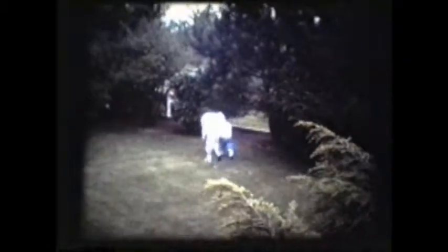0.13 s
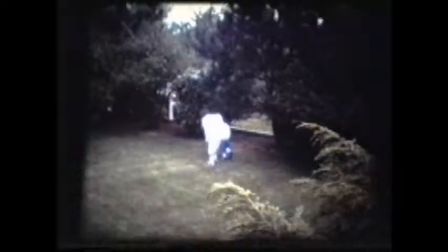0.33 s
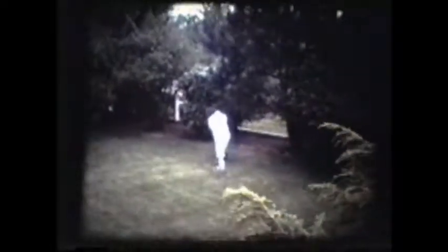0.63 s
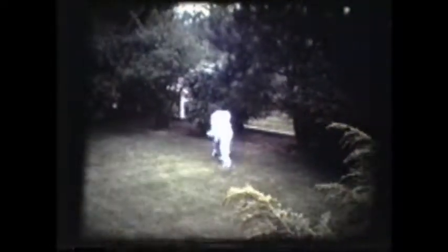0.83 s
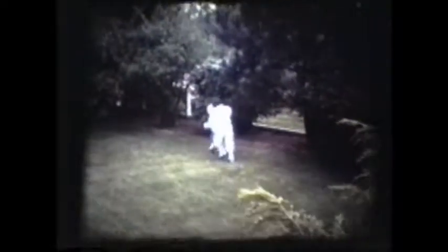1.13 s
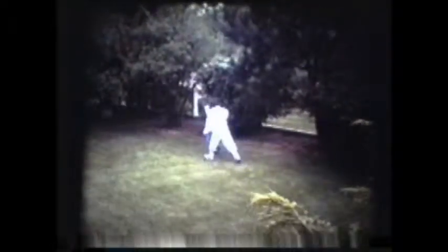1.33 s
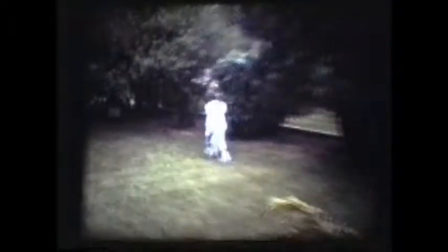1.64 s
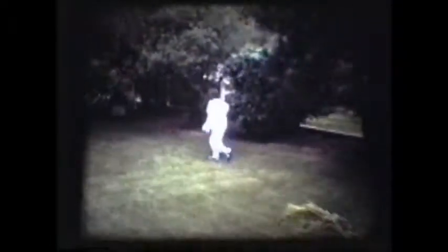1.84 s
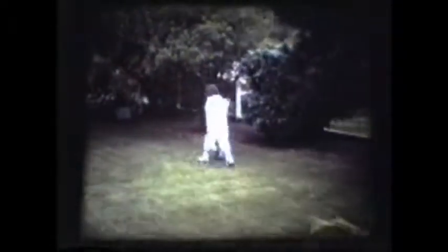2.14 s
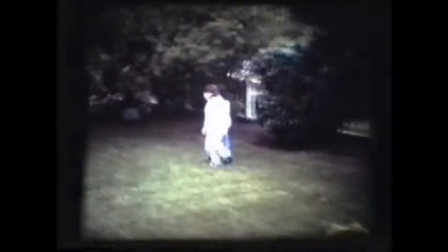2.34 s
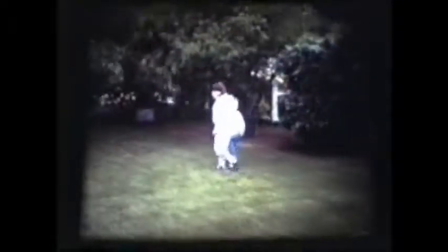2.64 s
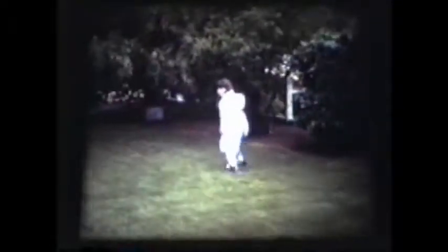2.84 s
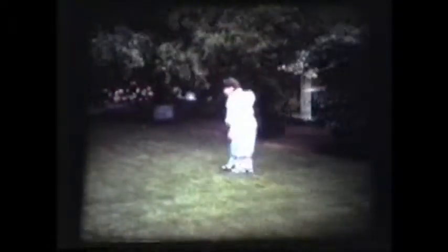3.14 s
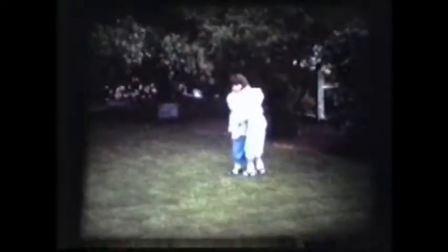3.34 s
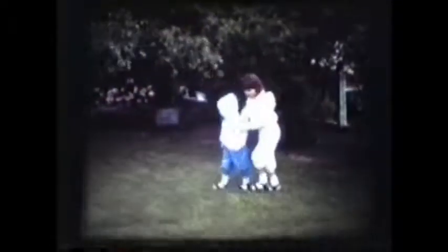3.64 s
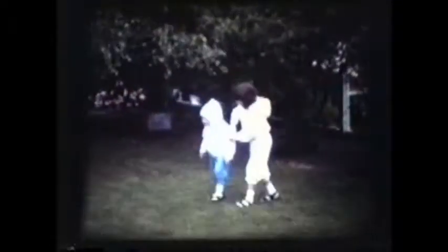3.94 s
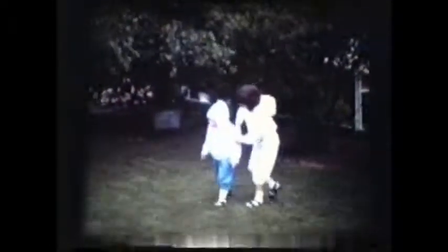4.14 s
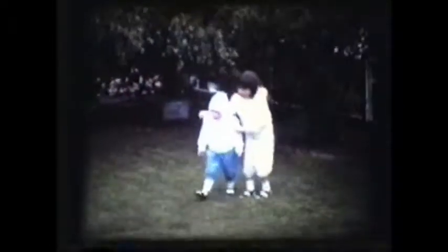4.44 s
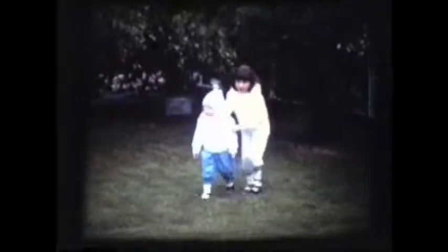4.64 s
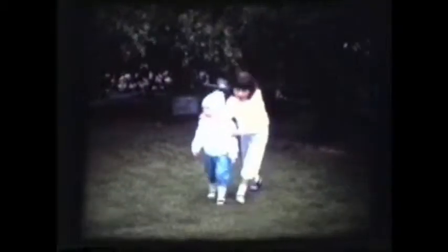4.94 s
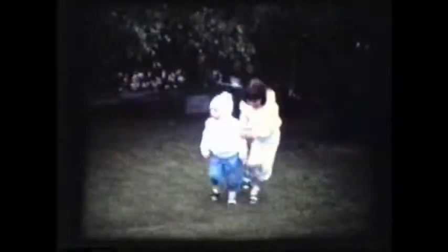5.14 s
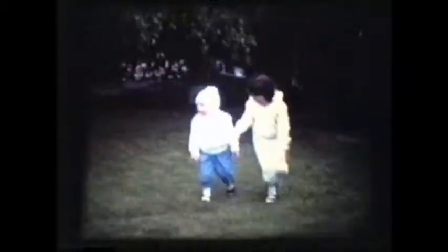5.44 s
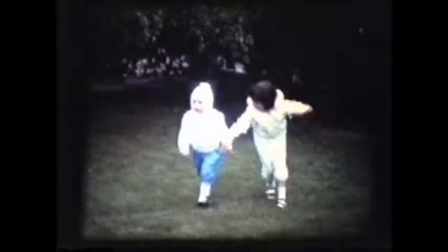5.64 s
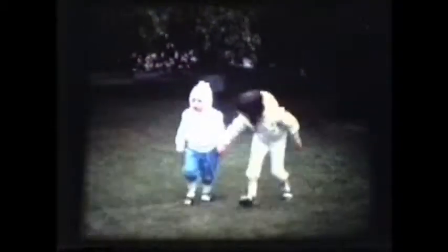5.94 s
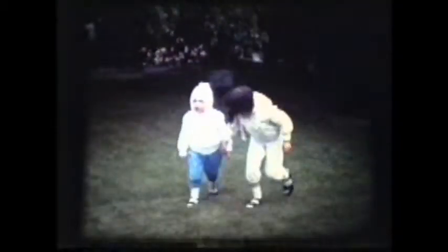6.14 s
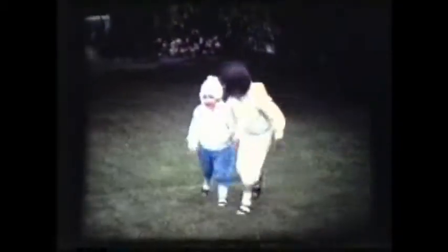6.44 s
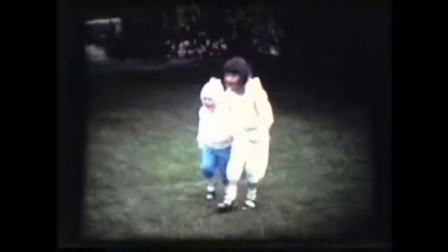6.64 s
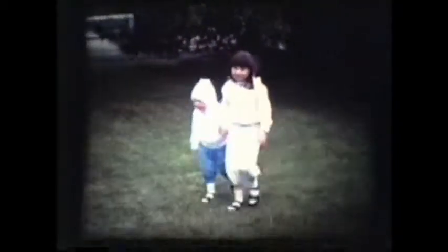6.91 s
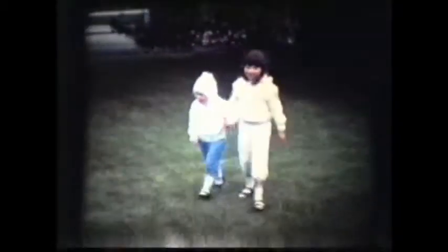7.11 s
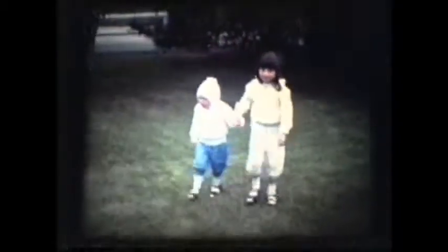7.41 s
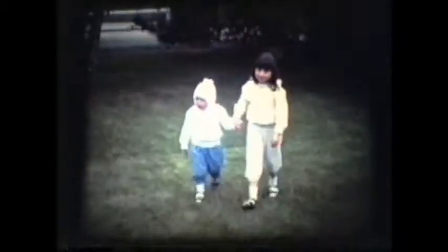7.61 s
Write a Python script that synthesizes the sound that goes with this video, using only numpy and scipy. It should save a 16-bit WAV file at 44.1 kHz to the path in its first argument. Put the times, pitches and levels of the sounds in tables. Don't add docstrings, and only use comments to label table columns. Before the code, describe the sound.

Fast, even metallic clatter from an old home movie projector on a table, heard close with short room reflections. Ringing ticks, loose slaps and gear noise blend with motor hum, a thin whine and airy fan rush. The machine keeps a constant speed throughout, but the sound drops out five times, each with a small bassy thump, near silence, and a quick return.

```python
import sys
import numpy as np
from scipy import signal
from scipy.fft import rfft, irfft, next_fast_len
from scipy.io import wavfile

SR = 44100
rng = np.random.default_rng(int(sys.argv[2]) if len(sys.argv) > 2 else 0)


def wav_out(sig):
    wavfile.write(sys.argv[1], SR, np.round(np.clip(np.atleast_2d(sig).T, -1, 1) * 32767).astype(np.int16))


def gain_from_db(level_db):
    decades = np.asarray(level_db, float) / 20
    return 10 ** decades


N = 342657
FRAME_HZ = 17.585


def rms_one(x):
    return x / np.sqrt(np.mean(x ** 2) + 1e-20)


def shaped(x, spectrum):
    hz, db = np.transpose(spectrum)
    size = next_fast_len(N)
    bin_hz = np.fft.rfftfreq(size, 1 / SR) + 1
    gain = gain_from_db(np.interp(np.log(bin_hz), np.log(hz), db))
    return rms_one(irfft(rfft(x, size) * gain, size)[:N])


def drift(rate_hz):
    r = np.exp(-80 * np.pi * rate_hz / SR)
    noise = rng.standard_normal(N // 40 + 2002)
    slow = signal.lfilter([1], [1, -2 * r, r * r], noise)[2000:]
    return np.interp(np.arange(N) / 40, np.arange(len(slow)), rms_one(slow))


def ring(clicks, hz, width_hz):
    r = np.exp(-np.pi * width_hz / SR)
    w = 2 * np.pi * hz / SR
    return signal.lfilter([0, np.sin(w)], [1, -2 * r * np.cos(w), r * r], clicks + 1e-18)


def body(clicks, modes):
    return sum(gain_from_db(db) * (-1) ** k * ring(clicks, hz, width) for k, (hz, width, db) in enumerate(modes))


def strikes(contacts, jitter_s, spread_db):
    ms, level_db = np.transpose(contacts)
    start = np.arange(-1, int(N / SR * FRAME_HZ) + 1)[:, None] / FRAME_HZ
    at = start + ms / 1000 + jitter_s * rng.standard_normal((len(start), len(ms)))
    height = gain_from_db(level_db + spread_db * rng.standard_normal(at.shape))
    clicks = np.zeros(N + 2 * SR)
    np.add.at(clicks, (at * SR).astype(int), height)
    return clicks[:N]


def tones(lines, waver_db, wander):
    t = np.arange(N) / SR
    total = np.zeros(N)
    for hz, db in lines:
        level = np.sqrt(2) * gain_from_db(db + waver_db * drift(6.8))
        phase = 2 * np.pi * (hz * t + rng.random()) + wander * drift(1.5)
        total = total + level * np.sin(phase)
    return total


def rattle(clicks, swell, grain_db):
    rise, fall = np.exp(-1 / (0.0012 * SR)), np.exp(-1 / (0.0029 * SR))
    after = signal.lfilter([1], np.convolve([1, -rise], [1, -fall]), np.sqrt(clicks))
    grains = rng.standard_normal(N) * gain_from_db(grain_db * drift(130))
    return grains * (1 + swell * after / np.mean(after))


# f/Hz, level/dB rms
HUM = [(50.0, -76.5), (99.97, -70), (149.96, -44), (249.93, -55), (299.9, -73), (349.9, -57.5),
       (449.9, -62.5), (549.8, -62.5)]
# f/Hz, level/dB rms
ROTOR = [(225.4, -66), (285.3, -66), (660.1, -64), (664.8, -62), (812.9, -63), (855.3, -57.5)]


def motor():
    return tones(HUM, waver_db=0.1, wander=0.045) + tones(ROTOR, waver_db=-1.5, wander=0.66)


# f/Hz, level/dB per Hz
FAN = [(15, -37.5), (25, -15.5), (110, -21), (200, -11.5), (300, -15), (400, -7), (520, -9), (750, -4),
       (1000, -5), (1500, -7.5), (2000, -5), (2400, -11), (3200, -18.5), (6000, -47.5)]


def fan(clicks):
    return gain_from_db(-42 + 0.5 * drift(6.4)) * shaped(rattle(clicks, swell=0.17, grain_db=0.7), FAN)


# f/Hz, level/dB per Hz
GEARS = [(1760, -27), (3000, -1.5), (3500, -6.5), (3800, -2.5), (4550, -2), (5050, -6.5), (6270, -8),
         (7010, -15), (9060, -23.5), (10200, -20.5), (12200, -33), (14000, -21), (15800, -28.5)]


def gears(clicks):
    return gain_from_db(-52.5 + 0.24 * drift(4.1)) * shaped(rattle(clicks, swell=0.2, grain_db=2.0), GEARS)


# f/Hz, level/dB per Hz
LINE_HISS = [(18, -30.5), (30, -1), (76, -8), (279, -6.5), (1110, -8.5), (2500, -8.5), (5000, -12.5),
             (8500, -17.5), (10500, -27.5), (16000, -54)]
# f/Hz, level/dB rms
LINE_HUM = [(49.99, -96), (149.96, -101), (499.9, -105), (599.8, -105), (699.8, -103), (799.8, -104),
            (999.7, -104), (1099.7, -104), (1599.6, -104)]


def line_noise(sink_db):
    hiss = gain_from_db(-82 + sink_db) * shaped(rng.standard_normal(N), LINE_HISS)
    return hiss + tones(LINE_HUM, waver_db=-1.5, wander=0.1)


# f/Hz, level/dB per Hz
SIDE_HISS = [(1200, -50.5), (2600, 6.5), (5500, -4), (9000, -21.5), (13000, -22), (16000, -37.5)]


def side_hiss(gain):
    side = gain_from_db(-74.5) * gain * shaped(rng.standard_normal(N), SIDE_HISS)
    return side * [[1], [-1]]


# t/ms, level/dB
KNOCK = [
    (0.3, -43.5),
]
# f/Hz, width/Hz, level/dB
BASE = [(334.1, 7, -8.5), (369.3, 9, -13), (386.9, 7, -4), (457.2, 9, -12), (615.5, 9, -12.5)]
# f/Hz, width/Hz, level/dB
HOUSING = [(1371.6, 14, -6), (1406.8, 14, -7), (1442, 14, -7), (1705.7, 14, -9)]
# t/ms, level/dB
PUSHES = [
    (48.5, -39.5),
]
# f/Hz, width/Hz, level/dB
CASING = [(519, 56, -12.5), (609.4, 44, -13.5), (745.7, 63.7, 1), (906, 45, -15.5), (1020, 50, -13.5)]


def casing():
    knock = strikes(KNOCK, jitter_s=0.00002, spread_db=-1.0)
    base = sum(gain_from_db(db) * ring(knock, hz, width) for hz, width, db in BASE)
    pushes = strikes(PUSHES, jitter_s=0.00004, spread_db=1.6)
    swell = np.zeros(N)
    for k, (hz, width, db) in enumerate(CASING):
        slow = pushes
        for _ in range(3):
            slow = ring(slow, hz, width)
        peak_to_one = 2 * (np.e * np.pi * width / SR) ** 2
        swell = swell + gain_from_db(db) * (-1) ** k * peak_to_one * slow
    return swell + base + body(knock, HOUSING)


# t/ms, level/dB
CONTACTS = [(0.5, -45.5), (7.5, -58.5), (13.5, -47.5), (16.5, -49.5), (24.0, -64.5), (31.0, -55),
            (37.0, -48.5), (45.5, -44.5), (49.0, -46), (53.0, -47.5)]
# f/Hz, width/Hz, level/dB
GATE = [(1871, 160, 8), (1930, 180, -2.5), (2249, 60, -2.5), (2856, 130, 0), (6060, 150, -20.5)]
# t/ms, level/dB
LOOSE_BLOWS = [
    (15.5, -40.5),
    (46.0, -33.5),
]
# t/s, level/dB
CLACKS = [(0.1022, -30), (0.1598, -31), (0.6722, -26), (1.2964, -25.5), (2.0941, -30), (2.2078, -25.5),
          (2.377, -29), (2.8323, -30), (3.0022, -31), (3.1738, -30), (3.201, -29), (3.286, -30),
          (3.6842, -29), (4.197, -30), (5.166, -30), (5.3009, -30), (5.676, -25.5), (6.2439, -28.5),
          (6.8116, -25.5), (7.097, -30), (7.1545, -30), (7.551, -31), (7.7244, -30)]
# f/Hz, width/Hz, level/dB
BLOW = [(1760, 330, 3), (2500, 600, -8), (4400, 900, -14)]
# t/ms, level/dB
TICKS = [(2.8, -55), (33.5, -47), (37.5, -50), (43.2, -43), (46.0, -46), (49.0, -47.5)]
# f/Hz, width/Hz, level/dB
TIP = [(3710, 350, 4), (4220, 93, -4.5), (4655, 120, -4), (5550, 120, -10)]


def gate():
    clicks = strikes(CONTACTS, jitter_s=0.0005, spread_db=3.5)
    slaps = strikes(LOOSE_BLOWS, jitter_s=0.0012, spread_db=3.0)
    s, clack_db = np.transpose(CLACKS)
    slaps[(s * SR).astype(int)] = gain_from_db(clack_db + 1.3)
    ticks = strikes(TICKS, jitter_s=0.00015, spread_db=1.8)
    soften = signal.butter(2, 5000, fs=SR, output="sos")
    soft_slaps = signal.sosfilt(soften, slaps + 1e-18)
    ringing = body(clicks, GATE) + body(soft_slaps, BLOW) + body(ticks + 0.1 * clicks, TIP)
    return clicks + 0.21 * slaps, ringing


TEETH_DB = [-34.5, -41, -34, -44, -44.5, -63, -38, -48.5]
# f/Hz, width/Hz, level/dB
COVER = [(1290, 150, -17.5), (1408, 87, -7), (1570, 100, -6)]


def gear_cover():
    first_ms = 0.74
    ms = first_ms + 1000 * np.arange(len(TEETH_DB)) / len(TEETH_DB) / FRAME_HZ
    return body(strikes(list(zip(ms, TEETH_DB)), jitter_s=0.00002, spread_db=3.5), COVER)


def room(x):
    t60_s, level_db = 0.22, -9
    t = np.arange(int(0.25 * SR)) / SR
    tail = rng.standard_normal(len(t)) * gain_from_db(-60 * t / t60_s) * (t > 0.002)
    tail = tail / np.sqrt(np.sum(tail ** 2))
    return x + gain_from_db(level_db) * signal.fftconvolve(x, tail)[:N]


# off t/s, on t/s, voltage step at the cut (full scale 1)
MUTES = [
    (.2611, .480, -.0082),
    (1.3009, 1.760, -.0114),
    (3.3008, 3.560, -.0104),
    (4.3004, 4.520, -.0081),
    (7.1802, 7.480, -.0089),
]


def muting():
    leak_db, leak_db_per_s, return_s = -40, -900, 0.0091
    t, gain, jolt = np.arange(N) / SR, np.ones(N), np.zeros(N)
    for off, on, step in MUTES:
        leak = gain_from_db(leak_db + leak_db_per_s * np.maximum(t - off, 0))
        back = 1 - np.exp(-np.maximum(t - on, 0) / return_s)
        gain = gain * np.where(t < off, 1, np.maximum(leak, back))
        jolt = jolt + step * (t >= off - 0.001)
    edge = np.hanning(14)
    edge = edge / edge.sum()
    return np.convolve(gain, edge, "same"), np.convolve(jolt, edge)[:N]


def after_cuts():
    t, sag, sink_db = np.arange(N) / SR, np.zeros(N), np.zeros(N)
    for off, on, step in MUTES:
        late = np.maximum(t - off, 0) / 0.14
        sag = sag + 0.013 * step * late ** 3 * np.exp(3 * (1 - late))
        sink_db = np.where(t > off, -7.5 * np.minimum(t - off, on - off), sink_db)
    return sag, sink_db


COUPLING_HZ = [16.8, 4.85, 4.85, 4.85]


def coupling(line):
    for corner_hz in COUPLING_HZ:
        line = signal.lfilter([1, -1], [1, -np.exp(-2 * np.pi * corner_hz / SR)], line)
    return line


def scene():
    clicks, claw = gate()
    mono = room(claw + fan(clicks) + gears(clicks))
    mono = mono + casing() + gear_cover() + motor()
    return np.array([mono, mono])


def low_pass(x):
    return signal.sosfilt(signal.butter(12, 16040, fs=SR, output="sos"), x)


def record(dry):
    gain, jolt = muting()
    sag, sink_db = after_cuts()
    line = coupling(dry * gain + jolt)
    mix = line + sag + line_noise(sink_db) + side_hiss(gain)
    top_cut = signal.cheby2(14, 40, 16190, fs=SR, output="sos")
    return low_pass(signal.sosfilt(top_cut, mix))


dry = scene()
out = record(dry)
wav_out(out)
```